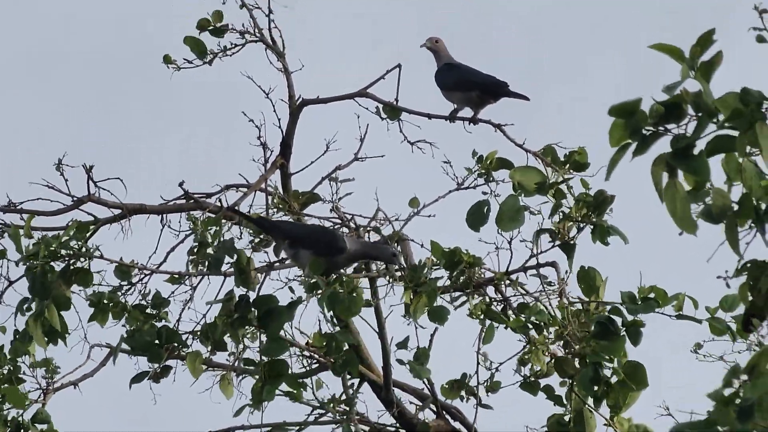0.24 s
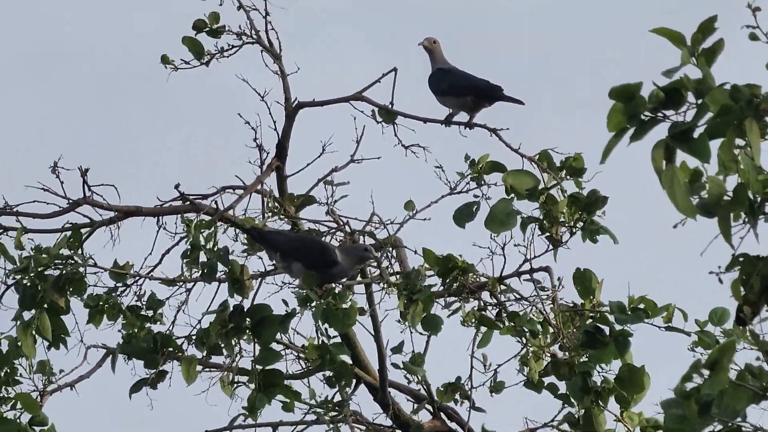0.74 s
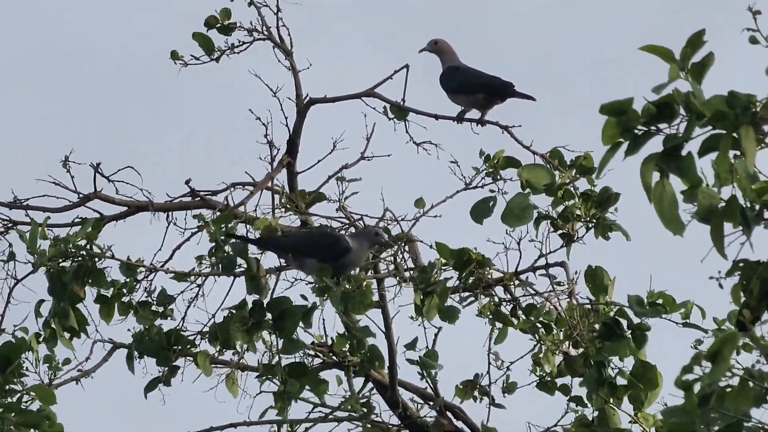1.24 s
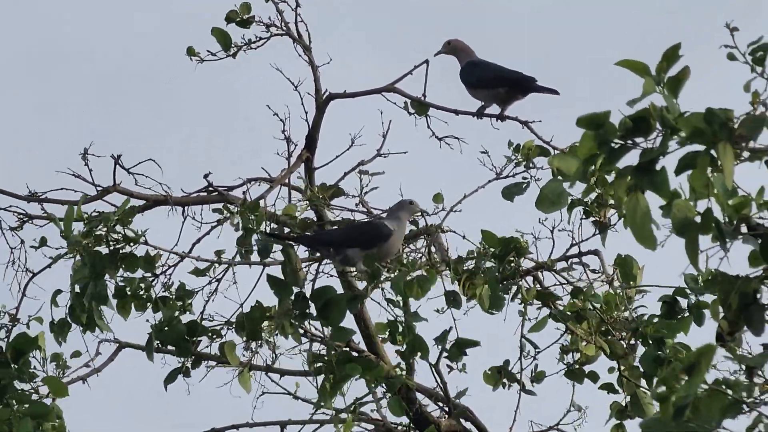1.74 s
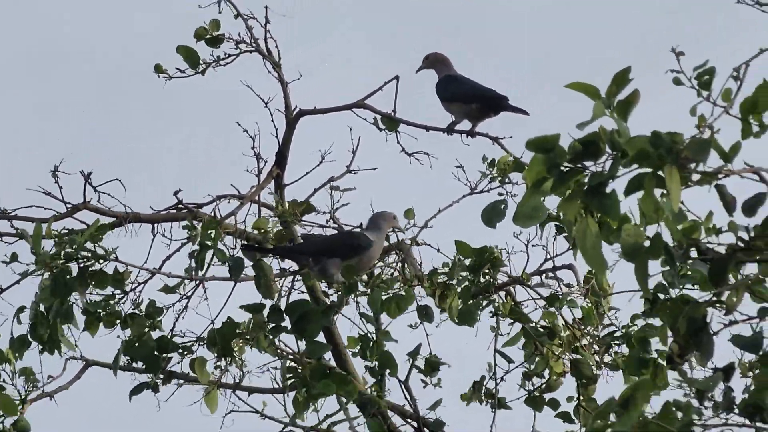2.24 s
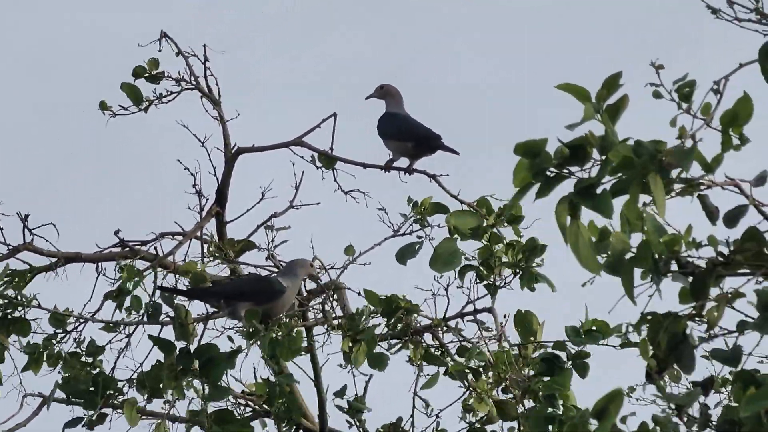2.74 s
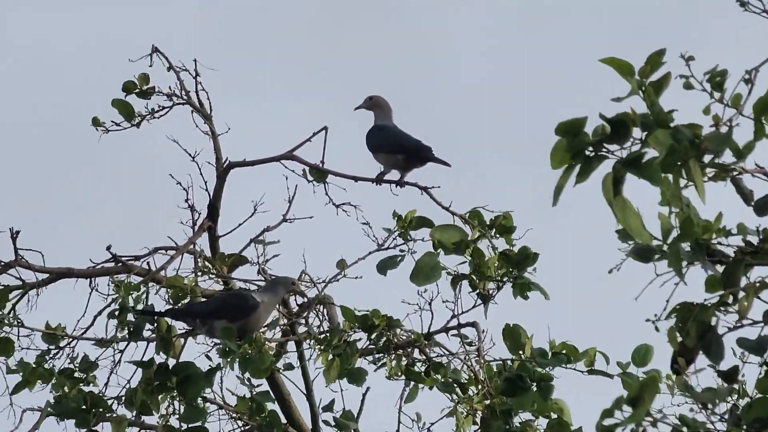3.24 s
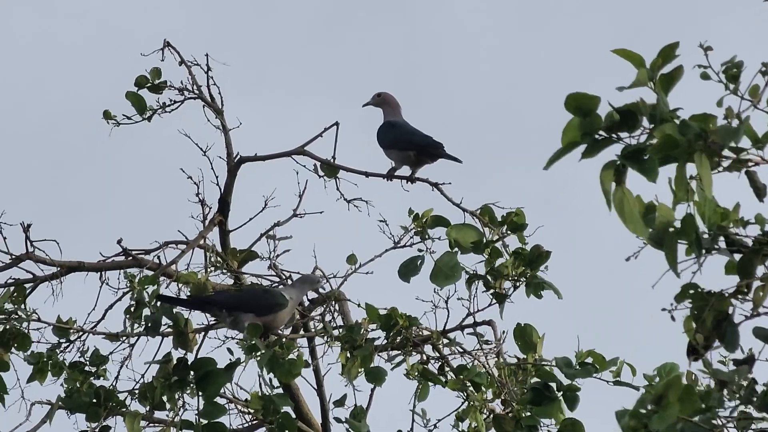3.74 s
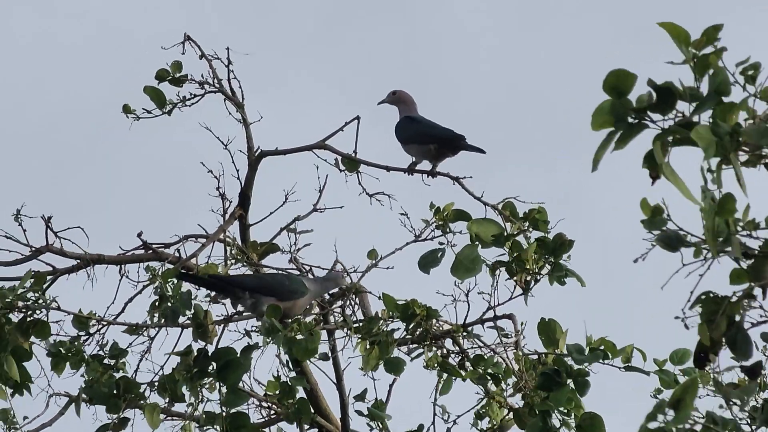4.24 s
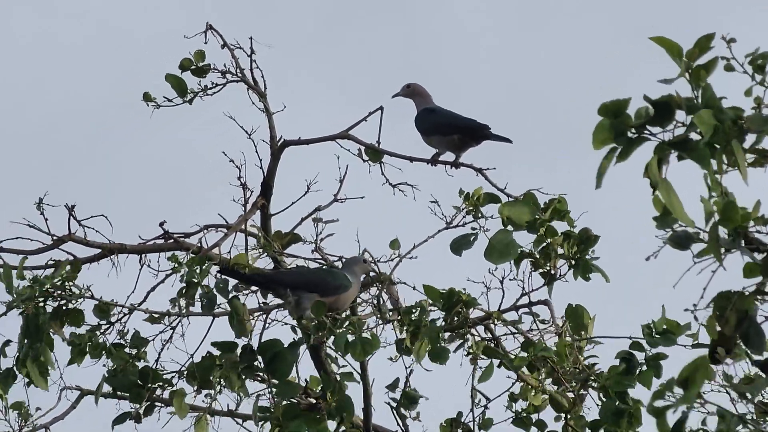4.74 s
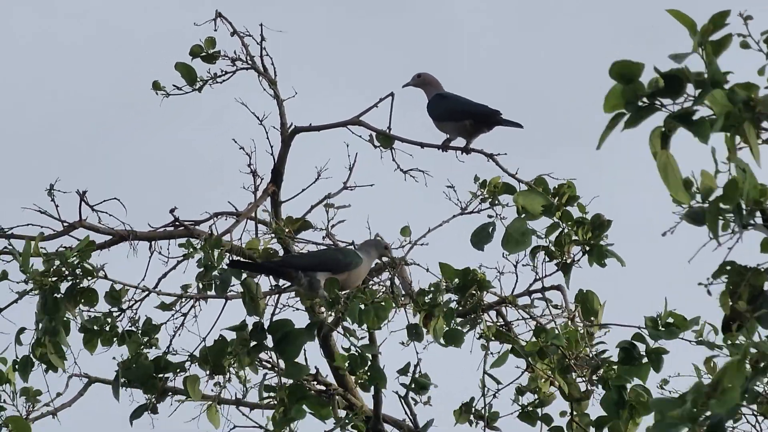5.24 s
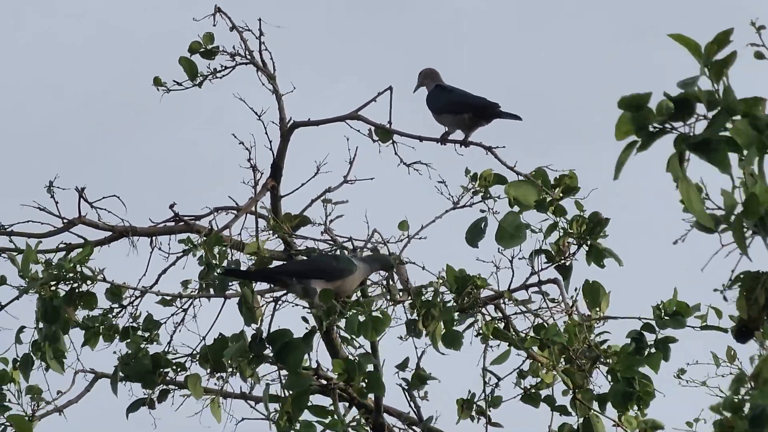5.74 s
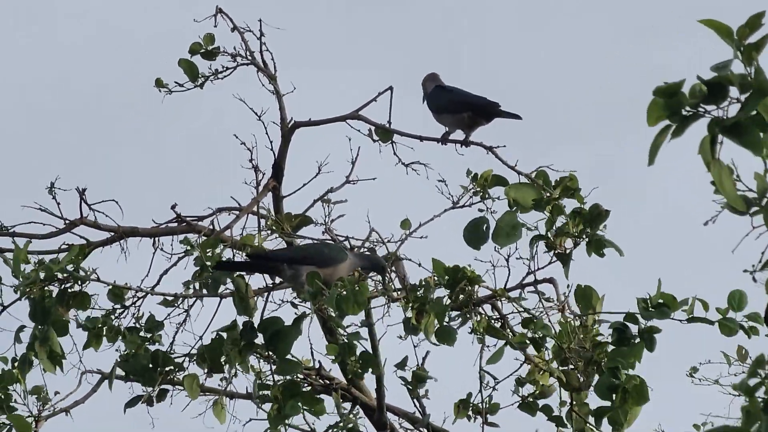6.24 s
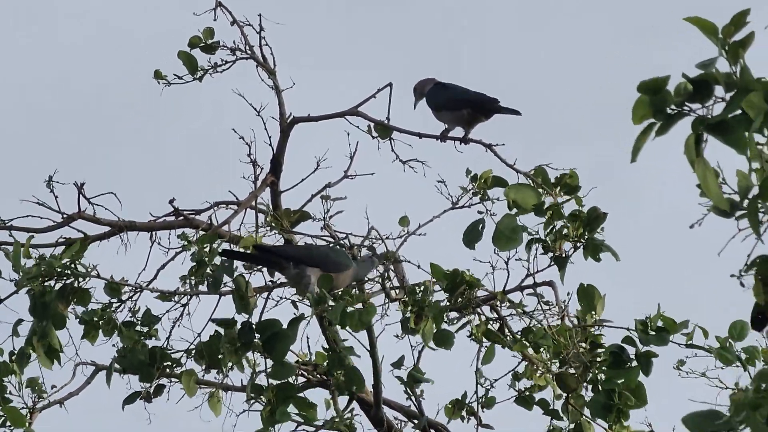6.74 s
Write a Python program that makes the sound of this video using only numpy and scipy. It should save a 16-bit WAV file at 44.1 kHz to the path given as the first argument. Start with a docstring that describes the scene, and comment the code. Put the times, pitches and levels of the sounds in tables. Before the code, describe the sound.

A steady high insect drone with scattered short bird chirps and whistles, over the low uneven rumble of wind on the microphone.

```python
"""A woodland edge in a light breeze, heard through two microphones. Small birds whistle gliding,
near-sine notes near and far, and one gives a hoarse two-part call by pulsing its tone; the trees
scatter their echoes. Crickets and a bush cricket stroke their wings and cicadas click their tymbals,
each driving a resonance. Gusts buffet and hiss at the microphones over a far-off wash.
An automatic gain briefly lifts the high background hiss during loud near chirps."""
import sys
import numpy as np
from scipy import signal
from scipy.io import wavfile
from scipy.ndimage import uniform_filter1d

SR = 44100
rng = np.random.default_rng(int(sys.argv[2]) if len(sys.argv) > 2 else 0)


def bounce(signal):
    """Save signal as a 16-bit WAV file at the path given by the first command-line argument."""
    frames = np.transpose(np.atleast_2d(signal))
    limited = np.clip(frames, -1, 1)
    pcm = np.round(limited * 32767).astype(np.int16)
    wavfile.write(sys.argv[1], SR, pcm)


N = 307818

# lone notes: start_s, length_s, start_hz, middle_hz, end_hz, level_db, pan_db, left_lag_us
LONE_NOTES = [(0.033, 0.057, 6760, 6340, 6230, -60, 14, -2), (0.635, 0.056, 3390, 3480, 3350, -51, -2, 10),
              (0.775, 0.24, 3290, 3387, 3240, -51.5, -1.5, -17),
              (1.085, 0.095, 3320, 2980, 2500, -54, -4, -3), (1.159, 0.044, 2480, 2330, 2205, -47, -3, 2),
              (1.259, 0.012, 3680, 3750, 3230, -51, -3, 90), (1.267, 0.035, 2560, 2185, 1870, -59, 0, 0),
              (1.291, 0.019, 4040, 3630, 3300, -50.5, -1, 80),
              (1.444, 0.055, 2550, 2390, 2320, -62, 2, -50),
              (2.014, 0.022, 3850, 3520, 3220, -58.5, -1, 78),
              (2.186, 0.041, 3610, 3220, 2860, -61, -1, 50), (2.317, 0.056, 4100, 4380, 4330, -60, 1, -50),
              (2.565, 0.015, 6550, 6200, 5810, -59, 9, 0), (2.722, 0.12, 7600, 6840, 5700, -59.5, 1, 23),
              (2.837, 0.064, 4680, 3720, 3350, -57, -2, 110), (2.903, 0.025, 3940, 3770, 3520, -56, -1, 80),
              (3.963, 0.074, 3490, 3530, 3700, -57, -1, 80),
              (4.156, 0.025, 2440, 1930, 1820, -53.5, -1, 148),
              (4.23, 0.061, 1950, 2040, 2030, -58, 3, 210), (4.95, 0.053, 4190, 4240, 3550, -52, 1, -80),
              (4.977, 0.046, 3510, 3576, 3200, -50, 1, 130), (5.024, 0.028, 4500, 4650, 4420, -53, 1, -50),
              (5.084, 0.066, 4000, 4180, 5000, -49, 1, 122), (5.204, 0.032, 5060, 5130, 4420, -53, 1, 128),
              (5.488, 0.038, 2570, 2710, 2190, -56, -1, 150), (6.15, 0.076, 7240, 6600, 6070, -52, 7, 38),
              (6.218, 0.086, 6030, 5000, 4670, -56, 0, 30)]
# notes of a near bird's song: delay_s, length_s, start_hz, middle_hz, end_hz, relative_db
SONG_NOTES = [(0, 0.023, 7400, 6800, 5900, 2.5), (0.024, .021, 3430, 3900, 4200, -7.5),
              (0.05, 0.018, 4280, 3850, 3300, 0), (0.077, 0.044, 5500, 5450, 5330, 0),
              (.085, .018, 5150, 4640, 4100, -0.5)]
# each time it sings: start_s, level_db, opening_stress_db, closing_stress_db, pan_db
SONG_TIMES = [(.064, -50.5, -3, -1, -3), (.347, -47.5, -4, 4.5, -1), (.622, -46, -18, 2, 0),
              (.903, -47.5, -9, -4, -1), (1.181, -49.5, -9, -20, 2), (1.469, -52.5, -3, -22, 0)]
# a loud chirp that dives and climbs: delay_s, length_s, start_hz, middle_hz, end_hz, relative_db
CHIRP_NOTES = [(-.009, .013, 6150, 6370, 7140, -22), (0, .016, 6860, 6480, 5700, -1),
               (0.0074, 0.013, 6020, 4560, 3750, -9.5), (0.029, 0.031, 2800, 3300, 3670, -12.5),
               (.048, .013, 3800, 4100, 4320, -6), (0.068, 0.0224, 5090, 5260, 5640, -8.5)]
# each such chirp: start_s, level_db, time_stretch, pan_db, left_lag_us
CHIRP_TIMES = [(3.298, -33, 1.0, 0.5, -9), (6.422, -33.5, 1.11, 0, 59)]
# quick falling calls on the left: start_s, level_db
QUICK_CALLS = [(2.506, -52), (2.759, -56), (3.032, -55)]

def songbirds():
    """Frequency modulation: every song, chirp and call is made of gliding whistles."""
    notes = list(LONE_NOTES)
    for s, db, opening_db, closing_db, pan_db in SONG_TIMES:
        stresses_db = (opening_db, 0, 0, closing_db, closing_db)
        for (delay, *glide, note_db), stress_db in zip(SONG_NOTES, stresses_db):
            notes.append((s + delay, *glide, db + note_db + stress_db, pan_db, 114))
    for s, db, stretch, pan_db, lag_us in CHIRP_TIMES:
        notes += [(s + stretch * delay, stretch * length, *glide, db + note_db, pan_db, lag_us)
                  for delay, length, *glide, note_db in CHIRP_NOTES]
    notes += [(s, 0.015, 3980, 3690, 3200, db, 5.5, 54) for s, db in QUICK_CALLS]
    return whistles(notes)


def whistles(notes):
    """Multipath fading: leaves and moving air break up sine tones that glide along a parabola."""
    out = np.zeros((2, N))
    for s, length, start_hz, mid_hz, end_hz, db, pan_db, lag_us in notes:
        u = np.arange(round(length * SR)) / (length * SR)
        hz = start_hz * (1 - u) * (1 - 2 * u) + 4 * mid_hz * u * (1 - u) + end_hz * u * (2 * u - 1)
        turns = np.cumsum(hz) / SR - np.array([[lag_us * 1e-6], [0]]) * hz
        scatter = np.clip(lag_us / 200, .3, .8)  # birds more to the right sit farther off
        real, imag = uniform_filter1d(rng.standard_normal((2, 2, len(u))), 330, 2) * np.sqrt(165)
        path = np.sqrt(1 - scatter ** 2) + scatter * (real + 1j * imag)
        tone = np.sqrt(2) * (path * np.exp(2j * np.pi * turns)).imag
        add(out, s, gain_of(db) * sides(pan_db) * tone * np.sin(np.pi * u) ** .35)
    return out


# hoarse syllables: start_s, length_s, start_hz, end_hz, pulse_hz, level_db, rasp_db, pan_db
HOARSE_CALLS = [(2.891, 0.085, 1550, 1207, 110, -53, -8, 3), (3.008, .15, 2120, 2136, 55, -47.5, -0.5, 2),
                (6.744, 0.083, 1600, 1190, 87, -53, -13, 2),
                (6.865, 0.125, 2170, 2207, 55.4, -44.5, -7.5, 3)]

def hoarse_bird():
    """Amplitude modulation: uneven pulses break up a whistle and ring a higher throat resonance."""
    out = np.zeros((2, N))
    for s, length, start_hz, end_hz, pulse_hz, db, rasp_db, pan_db in HOARSE_CALLS:
        t = np.arange(round(length * SR)) / SR
        hz = start_hz + (end_hz - start_hz) * t / length
        jitter, fade = uniform_filter1d(rng.standard_normal((2, len(t))), 500) * np.sqrt(500)
        pulses = abs(np.sin(np.pi * np.cumsum(pulse_hz * (1 + 0.18 * jitter)) / SR))
        carrier = np.sin(2 * np.pi * np.cumsum(hz * (1 + 0.01 * jitter)) / SR)
        tone = carrier * (0.026 + pulses) * gain_of(2.4 * fade)
        breath = (1.2 - pulses) * rng.standard_normal((2, len(t)))
        rasp = resonate(breath, hz + 250 + 2500 * t, width_hz=340)
        call = (unit_rms(tone) + gain_of(rasp_db) * unit_rms(rasp)) * signal.windows.tukey(len(t), .2)
        add(out, s, gain_of(db) * sides(pan_db) * call)
    return out


# cricket chorus: time_s, relative_db, first_pause_depth_db, second_pause_depth_db
CRICKET_LEVELS = [(0, -54, 0, 11), (.3, -61, 6, 4), (.5, -57, 6, 1), (1.3, -55, 4, 3), (1.9, -56.5, 19, 7),
                  (3.2, -57, 12, 4), (3.7, -54.5, 9, 8), (4.88, -55.5, 3, 0), (5.17, -51.5, 8, -2),
                  (5.3, -53.5, 0, -3), (6.0, -56.5, 1, 5), (6.98, -55, -2, 1)]
# the two singers: stroke_hz, wing_hz, pan_db, chirp_hz, mid_chirp_s
CRICKET_VOICES = [(97.7, 5520, -2, 10.82, 2.32), (90., 5340, -2.5, 8.94, 1.96)]

def crickets():
    """Stridulation: strokes ring narrow wing modes; each singer pauses about ten times a second."""
    t, out = np.arange(N) / SR, 0
    level_db, *depths_db = follow(CRICKET_LEVELS)
    for (stroke_hz, hz, pan_db, chirp_hz, mid_chirp_s), depth_db in zip(CRICKET_VOICES, depths_db):
        rub = pulsed_noise(stroke_hz, wander=0.022, decay_cycles=0.51, depth=0.61, shared=0.55)
        main_mode = resonate(resonate(rub, hz, width_hz=400), hz, width_hz=400)
        wing = main_mode + gain_of(-11.0) * resonate(rub, hz - 400, width_hz=280)
        pause = np.exp(-1.85 * (1 + np.cos(2 * np.pi * chirp_hz * (t - mid_chirp_s))))
        out = out + sides(pan_db) * unit_rms(wing) * gain_of(-depth_db * (pause - .3))
    return gain_of(level_db + 1.02 + 1.6 * drift(1500)) * out


# cicada chorus: time_s, relative_db
CICADA_LEVELS = [(0, -53), (.29, -54.5), (1.3, -53), (1.73, -55.5), (2.47, -52.5), (2.8, -57), (2.95, -53),
                 (4.47, -51.5), (4.7, -56), (4.8, -53), (5.72, -52), (5.8, -54.5), (6.98, -52.5)]
# body resonances: centre_hz, width_hz, relative_db
CICADA_MODES = [(7460, 540, -6), (9020, 800, -6.5), (9485, 900, 5), (9970, 580, -1.5), (10330, 660, -8.5)]

def cicadas():
    """Forced resonance: trains of tymbal clicks ring the wide modes of the body."""
    clicks = sum(pulsed_noise(hz, wander=0.0086, decay_cycles=0.4, depth=0.52, shared=0.096)
                 for hz in (149., 298., 141.))
    body = sum(gain_of(db) * unit_rms(resonate(clicks, hz, width)) for hz, width, db in CICADA_MODES)
    level_db = follow(CICADA_LEVELS)[0] + 1.4 + 1.06 * drift(2000)
    return gain_of(level_db) * sides(-4.5) * unit_rms(body)


def bush_cricket(first_s=.49, every_s=.578):
    """Impulse excitation: uneven wing strokes ring one mode in short, swelling trills on the left."""
    out, t = np.zeros((2, N)), np.arange(round(.16 * SR)) / SR
    for s in np.arange(first_s, N / SR, every_s):
        stroke_hz = 205 * (1 + .08 * unit_rms(uniform_filter1d(rng.standard_normal(len(t)), 600)))
        strokes = np.diff(np.floor(np.cumsum(stroke_hz) / SR), prepend=0) * rng.uniform(.5, 1.4, len(t))
        wing = unit_rms(resonate(strokes, 7320, width_hz=450))
        swell = signal.windows.tukey(len(t), .4) * (.5 + 1.8 * t)
        add(out, s, gain_of(-66) * sides(18.4) * wing * swell)
    return out


# breeze between gusts: time_s, buffet_db, pan_db, flutter_db
BREEZE = [(0, -37, -12, -57), (.35, -35.5, -2, -53), (.75, -35, -12, -53), (1.0, -38.5, -13.5, -46),
          (1.2, -41.5, -7, -54), (1.33, -29.5, 1, -54), (1.6, -35, 0, -53), (2.05, -34, -2.5, -51),
          (2.3, -39.5, 3, -66), (2.75, -33, -8, -50.5), (3.17, -35.5, -6, -64), (3.45, -32.5, -4.5, -40),
          (4.0, -32.5, -3, -44.5), (4.47, -30, 1, -59), (4.6, -43.5, 4, -58), (4.76, -41.5, -2, -55),
          (4.82, -35.5, 2, -56), (5.22, -29.5, 9.5, -49.5), (5.38, -42.5, -5, -53),
          (5.62, -31.5, -2, -50.5), (5.8, -35, -4.5, -47.5), (6.1, -32.5, -4, -39), (6.5, -28.5, -2, -47),
          (6.64, -33.5, 0.5, -55), (6.98, -30.5, -1, -50)]
# gusts: peak_s, length_s, buffet_db, pan_db, flutter_db, hiss_db
GUST_PEAKS = [(0.098, 0.17, -26, 0.5, -61, -70), (0.497, 0.26, -27.5, 9, -48, -68),
              (0.824, 0.11, -29, -9, -53, -70), (1.09, 0.15, -32, -7, -46, -70),
              (1.452, 0.073, -25.5, 5.5, -55, -70), (1.7, .1, -29, -2, -57, -70),
              (1.965, 0.088, -28, 15, -52, -68), (2.442, 0.089, -34.5, 4, -62, -64),
              (2.587, 0.048, -28.5, 21, -33, -61), (2.696, 0.16, -29.5, -3, -50, -63),
              (2.884, 0.09, -28, -12.5, -40.5, -62), (3.225, 0.032, -23, -7.5, -36.5, -60),
              (3.311, 0.08, -23.5, -1, -53, -65), (3.427, 0.076, -27, -1, -33, -63),
              (3.574, 0.22, -27, 1.5, -35.5, -51.5), (3.691, 0.11, -24.5, -0.5, -29, -59),
              (3.745, 0.083, -15.5, -1.5, -29.5, -54.5), (3.846, 0.04, -21, -4, -35, -58),
              (4.103, 0.13, -26, 5.5, -47, -64), (4.176, 0.31, -36, 2, -33.5, -70),
              (4.4, .06, -30, -3, -51, -58.5), (4.5, 0.063, -34, -2, -59, -52.5),
              (4.987, 0.066, -22.5, 7, -38, -55.5), (5.343, 0.12, -41, -9, -48.5, -56),
              (5.72, 0.046, -32, -13, -51, -56), (5.953, 0.23, -26.5, -8.5, -34.5, -60),
              (6.017, .08, -28.5, -11, -31, -58), (6.221, 0.21, -23, -2.5, -27.5, -58),
              (6.361, 0.24, -19, -1.5, -31.5, -56), (6.845, 0.2, -37, -4, -40, -56.5)]

def wind_levels(rise_share=0.46, drop_db=10):
    """Exponential envelopes: gusts rise and fall in straight dB ramps above the breeze."""
    t, half = np.arange(N) / SR, np.array([[.5], [-.5]])
    buffet_db, pan_db, flutter_db = follow(BREEZE)
    hiss_db = -67 + .3 * (flutter_db + 50.5)
    levels = np.array([buffet_db + half * pan_db, flutter_db + half * pan_db, [hiss_db, hiss_db]])
    for s, length, buffet_db, pan_db, flutter_db, hiss_db in GUST_PEAKS:
        near = slice(max(round((s - 2 * length) * SR), 0), round((s + 2 * length) * SR))
        ramp = np.maximum((s - t[near]) / rise_share, (t[near] - s) / (1 - rise_share)) / length
        peak = np.array([buffet_db + half * pan_db, flutter_db + half * pan_db, [[hiss_db], [hiss_db]]])
        levels[:, :, near] = np.maximum(levels[:, :, near], peak - drop_db * ramp)
    return levels


# spectra of the low buffeting and of the flutter at a gust's edge: frequency_hz, relative_db
BUFFET_SPECTRUM = [(10, -29), (25, -8.5), (45, 2.5), (80, 4.5), (120, -3.5), (160, -13.5), (230, -38),
                   (400, -35.5), (900, -120)]
FLUTTER_SPECTRUM = [(90, -10.5), (150, 8.5), (200, -5.5), (260, -8.5), (350, -16.5), (600, -33), (900, -51),
                    (2000, -95)]

def wind(buffet_db, flutter_db):
    """Turbulent pressure: rumble and brighter flutter at the microphones, more coherent in gusts."""
    coherence = 0.55 + 0.05 * (buffet_db.mean(0) + 33)
    flutter = stereo_noise(FLUTTER_SPECTRUM, patch_db=4.2, size=1024, coherence=coherence)
    flutter *= gain_of(flutter_db + 2.6 * drift(500))
    buffet_gain = gain_of(buffet_db + 1.48 * drift(4000))
    buffet = stereo_noise(BUFFET_SPECTRUM, patch_db=1.0, size=4096, coherence=coherence)
    return buffet_gain * buffet + flutter


# mid-band hiss of gusts at the microphones: frequency_hz, relative_db
GUST_HISS_SPECTRUM = [(350, -15), (600, -3), (1000, -8.5), (1400, -16.5), (2200, -44), (4000, -90)]

def gust_hiss(hiss_db):
    """Flow noise: a short mid-band hiss as a gust sweeps over both microphones at once."""
    gain = gain_of(hiss_db + 1.2 * drift(900))
    return gain * stereo_noise(GUST_HISS_SPECTRUM, patch_db=4.6, size=1024, coherence=np.full(N, .6))


# a far bird's falling whistles, about three a second: start_s, length_s, start_hz, level_db
FALLING_NOTES = [(2.923, .09, 4460, -59), (3.246, 0.1, 4350, -55.5), (3.552, 0.13, 4360, -58.5),
                 (3.879, 0.11, 4470, -65), (4.181, 0.088, 4270, -60), (4.469, 0.052, 4350, -56.5),
                 (4.77, 0.063, 4200, -59), (5.096, 0.05, 4000, -59), (5.425, .067, 4300, -59),
                 (5.687, 0.063, 3900, -65), (5.898, .05, 4080, -69), (6.02, .06, 4060, -68),
                 (6.27, 0.075, 4230, -62.5)]

def far_whistler(end_hz=3470, bend=0.47):
    """Downward frequency sweeps: a list of notes that all slide to the same closing pitch."""
    return [(s, length, hz, hz + bend * (end_hz - hz), end_hz, db, .3, 170)
            for s, length, hz, db in FALLING_NOTES]


def twitter(count, start_s, end_s, low_hz, octaves, loudest_db):
    """A random point process: a list of short falling notes from many far birds."""
    when, length, pitch, fall, softness, side = rng.random((count, 6)).T
    hz = low_hz * 2 ** (octaves * pitch)
    return np.transpose([start_s + (end_s - start_s) * when, .015 + .03 * length,
                         hz * (1 + .15 * fall), hz, hz * (1 - .12 * fall),
                         loudest_db - 5 * softness, 8 * side - 4, 80 * side + 90])


def tree_echoes(sound, t60_s):
    """Scattering: trunks and leaves return sparse echoes of random sign that die away."""
    taps = np.zeros((2, SR // 2))
    delays = np.arange(150, SR // 2 - 20, 20) + rng.integers(0, 20, (2, (SR // 2 - 151) // 20))
    np.put_along_axis(taps, delays, rng.choice([-1., 1.], delays.shape), 1)
    taps *= gain_of(-60 * np.arange(SR // 2) / SR / t60_s)
    return signal.fftconvolve(sound, taps / np.linalg.norm(taps[0]), axes=1)[:, :N]


# far-off wash and self-noise: frequency_hz, relative_db
WASH_SPECTRUM = [(100, -53), (250, -2), (380, -3.5), (480, -12.5), (746, -8), (940, -14.5), (1300, -9),
                 (2120, -11), (2800, -14.5), (3900, -16.5), (4700, -13), (6100, -17.5), (8000, -19.5),
                 (11500, -76), (13000, -28), (15700, -32)]

def far_wash(treble_lift_db):
    """The ambient noise floor: a broad, nearly steady wash whose treble wavers and can be lifted."""
    wash = gain_of(-54 + 0.6 * drift(2500)) * stereo_noise(WASH_SPECTRUM, patch_db=2.92, size=1024)
    treble = signal.sosfilt(signal.butter(4, 9000, "high", fs=SR, output="sos"), wash)
    return wash + (gain_of(treble_lift_db + 1.3 * drift(2500)) - 1) * treble


# likeness of the wash at the two microphones: frequency_hz, coherence
WASH_COHERENCE = [(60, 0.76), (300, 0.83), (600, 0.6), (1220, 0.93), (2010, 0.6), (3330, 0.11),
                  (6000, 0.11), (15000, 0.05)]

def stereo_noise(spectrum, patch_db, size, coherence=None):
    """Partial coherence: two microphones share part of a shaped noise with drifting spectral patches."""
    frames, hz = 4 * N // size + 5, np.fft.rfftfreq(size, 1 / SR)
    real, imag, own_real, own_imag, *patches = rng.standard_normal((frames, len(hz), 6)).T
    patches = unit_rms(uniform_filter1d(uniform_filter1d(np.array(patches), 8, 1), 8192 // size, 2))
    if coherence is None:
        shared = over_frequency(WASH_COHERENCE, hz)
    else:
        shared = np.clip(np.interp(np.arange(frames) * size / 4, np.arange(N), coherence), 0, 1)
    right = real + 1j * imag
    left = shared * right + np.sqrt(1 - shared ** 2) * (own_real + 1j * own_imag)
    bins = np.array([left, right]) * gain_of(patch_db * patches + over_frequency(spectrum, hz))
    return unit_rms(signal.istft(bins, nperseg=size, noverlap=3 * size // 4)[1][:, :N])


def pulsed_noise(rate_hz, wander, decay_cycles, depth, shared):
    """Periodic gating: an insect's decaying pulses modulate noise partly shared by both microphones."""
    turns = np.cumsum(rate_hz * (1 + wander * drift(9000))) / SR + rng.random()
    direct, left, right = rng.standard_normal((3, N))
    noise = np.sqrt(shared) * np.array([np.roll(direct, 8), direct])
    noise += np.sqrt(1 - shared) * np.array([left, right])
    return (1 - depth + depth * unit_rms(np.exp(-(turns % 1) / decay_cycles))) * noise


def resonate(x, hz, width_hz):
    """Heterodyning: shifting hz to zero, smoothing twice and shifting back gives a steep resonance."""
    carrier = np.exp(2j * np.pi * np.cumsum(hz * np.ones(x.shape[-1])) / SR)
    r = np.exp(-np.pi * width_hz / SR)
    baseband = signal.lfilter([(1 - r) ** 2], [1, -2 * r, r * r], x * carrier.conj() + 1e-18)
    return 2 * (carrier * baseband).real


def drift(samples):
    """Low-pass noise: a slow random wander of unit RMS."""
    return unit_rms(uniform_filter1d(uniform_filter1d(rng.standard_normal(N), samples), samples))


def gain_of(db):
    return 10 ** (np.asarray(db) / 20)


def unit_rms(x):
    return x / np.sqrt(np.mean(x ** 2) + 1e-20)


def over_frequency(points, hz):
    knots_hz, values = np.transpose(points)
    return np.interp(np.log(hz + 1), np.log(knots_hz + 1), values)[:, None]


def follow(rows):
    """Linear interpolation of each column over time."""
    times, *columns = np.transpose(rows)
    return [np.interp(np.arange(N) / SR, times, column) for column in columns]


def sides(pan_db):
    """Level difference: the left gain exceeds the right by pan_db."""
    return gain_of([[pan_db / 2], [-pan_db / 2]])


def add(mix, start_s, sound):
    part = mix[:, round(start_s * SR):][:, :sound.shape[1]]
    part += sound[:, :part.shape[1]]


def scene():
    """Superposition; an automatic gain briefly lifts the high background hiss during loud near chirps."""
    scattered = twitter(170, start_s=0, end_s=6.9, low_hz=1900, octaves=1.2, loudest_db=-65)
    flock = twitter(45, start_s=4.8, end_s=6.15, low_hz=3300, octaves=.45, loudest_db=-62.5)
    near = songbirds()
    far = whistles(np.vstack([far_whistler(), scattered, flock]))
    hoarse = hoarse_bird()
    echoes = tree_echoes(gain_of(-3.5) * near + gain_of(5.0) * far, t60_s=0.18)
    echoes += gain_of(-2.5) * tree_echoes(hoarse, t60_s=0.53)
    near_db = 10 * np.log10(abs(uniform_filter1d((near ** 2).mean(0), 1800)) + 1e-12)
    excess_db = np.maximum(near_db + 60.5, 0)  # the automatic gain opens above -60.5 dB
    insects = bush_cricket() + gain_of(.2 * excess_db) * crickets()
    insects += gain_of(0.19 * excess_db) * cicadas()
    left, right = near + far + hoarse + echoes + insects + far_wash(.12 * excess_db)
    airborne = np.array([left, np.roll(right, 18)])  # a further 18 samples to the right microphone
    buffet_db, flutter_db, hiss_db = wind_levels()
    return airborne + wind(buffet_db, flutter_db) + gust_hiss(hiss_db)


def record(dry):
    """Band limiting: a steep low-pass at 15.8 kHz."""
    lowpass = signal.firwin(1023, 15800, window=("kaiser", 9), fs=SR)
    return signal.oaconvolve(dry, lowpass[None], "same")


dry = scene()
out = record(dry)
bounce(out)
```